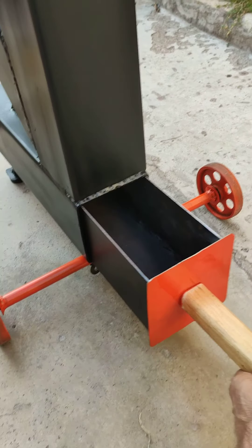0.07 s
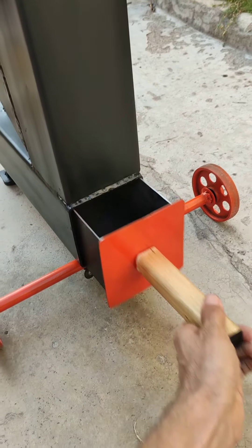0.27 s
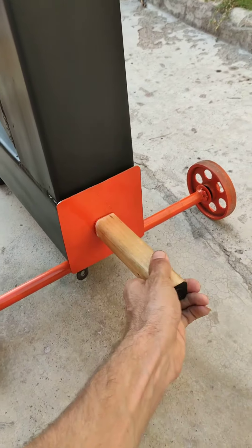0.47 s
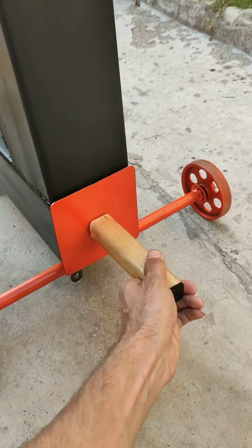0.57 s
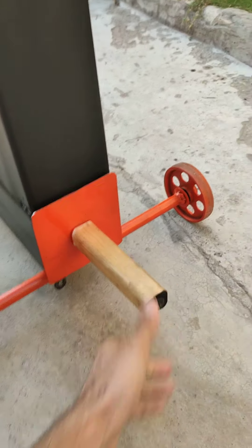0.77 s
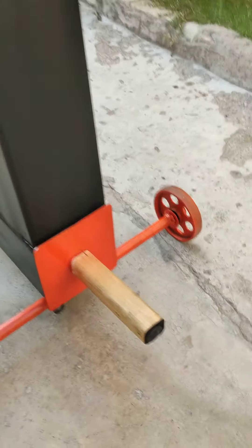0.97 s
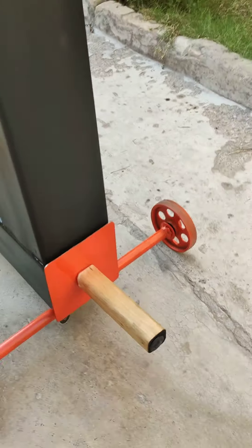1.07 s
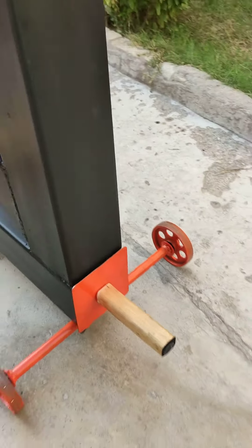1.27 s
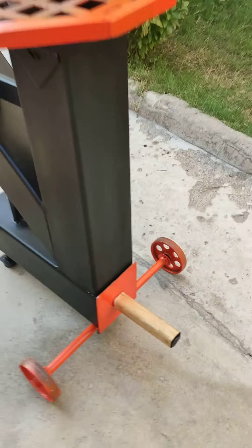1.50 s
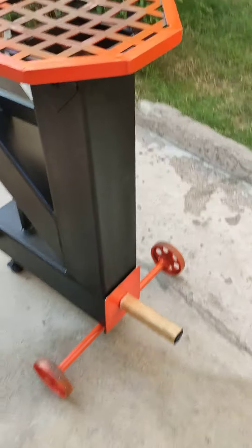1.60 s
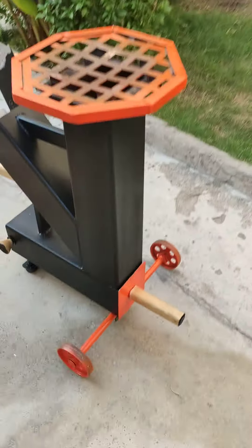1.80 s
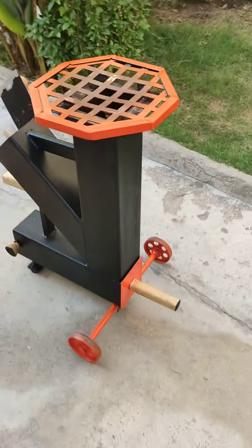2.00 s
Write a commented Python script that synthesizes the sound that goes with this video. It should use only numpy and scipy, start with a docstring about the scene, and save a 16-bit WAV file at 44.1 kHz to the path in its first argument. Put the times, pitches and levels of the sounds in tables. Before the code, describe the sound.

A steel drawer is pushed into a stove outdoors. From about 0.1 seconds it knocks in its guide and scrapes grittily, with brief squeals. Just after 0.5 seconds it shuts with a loud metallic clank whose ring dies away by about 1 second. From 1.2 to 2 seconds come soft, close ticks and rustles. A faint low rumble and hum lie underneath, with slight puffs of air on the microphone.

```python
"""A knocking, gritty scrape ends in a ringing clank: a sheet-steel drawer is pushed into a stove outdoors.
The drawer judders in its guide; steel catches and slips on steel, grinding and briefly squealing.
The clank is a quick run of front-plate contacts that leaves the stove's panels ringing.
Behind it lie a faint low rumble, a hum and puffs of air; later come soft ticks and rustles close by."""
import sys
import numpy as np
from scipy import signal
from scipy.fft import rfft, irfft
from scipy.io import wavfile
from scipy.ndimage import uniform_filter1d

SR = 44100
rng = np.random.default_rng(int(sys.argv[2]) if len(sys.argv) > 2 else 0)


def write(x):
    x = np.atleast_2d(x).T
    wavfile.write(sys.argv[1], SR, np.round(np.clip(x, -1, 1) * 32767).astype(np.int16))


N = 90404
TIME_S = np.arange(N) / SR

# Front plate hits the stove: start_s, ring_rel_db, crack_rel_db, thud_rel_db
CONTACTS = [(0.5296, -5.5, -2.5, -29), (0.5324, -1.5, 1.5, 5.5), (0.5382, -3, 4.5, -20.5),
            (0.5421, -16, 4.5, -4.5), (.551, -4.5, -1.5, -8), (0.5626, -6, -17, -23)]
# Stove modes: freq_hz, level_rel_db, t60_s, left_minus_right_db
STOVE_MODES = [(205, -42, 1.0, 0), (618, -26, 0.36, -1), (703, -30, 0.5, 1), (934, -33, 0.55, 1),
               (1086, -33, 0.75, 3), (1143, -38, 1.3, -5), (1198, -30, 0.35, 3), (1256, -32, 0.38, 5),
               (1385, -31, 0.34, -3), (1529, -29, 0.32, -6), (1714, -30, 0.42, -6), (1772, -26, 0.31, -6),
               (1965, -31, 0.37, -2), (2112, -32, 0.37, -5), (2422, -28, 0.21, 8), (2697, -34, .26, 0),
               (3064, -35, 0.28, 9), (3531, -35, .3, 3), (3885, -35, 0.27, 1), (4398, -33, 0.2, 8),
               (5580, -32, .21, 6)]
# Dense panel modes: freq_hz, density_rel_db
PANEL_SPECTRUM = [(150, -3), (300, -17), (600, 4.5), (1100, 1), (2100, 3), (2700, -4.5), (4500, -11),
                  (6300, -12), (7500, -25), (15500, -40)]
# Panel decay: freq_hz, t60_s
PANEL_DECAY = [(200, 0.54), (700, 0.33), (2000, 0.29), (6000, 0.29), (12000, 0.24)]
# Contact crack: freq_hz, density_rel_db
CRACK_SPECTRUM = [(300, -24), (1000, 7), (3300, 2), (6000, 2.5), (7200, -5.5), (9500, -9.5), (11000, -18.5),
                  (15500, -17)]
# Crack decay: freq_hz, t60_s
CRACK_DECAY = [(1000, 0.059), (5000, 0.072), (12000, 0.047)]
# Heavy stove body: freq_hz, level_rel_db
THUD_MODES = [(200, -8), (305, -1.5), (450, -4.5)]
# Friction along the slide: time_s, grind_rel_db, grit_rel_db
SLIDE_LEVELS = [(0.079, -48.5, -49), (.11, -36.5, -48.5), (.16, -37, -44.5), (.188, -40.5, -41),
                (.2, -35.5, -33), (.28, -36, -34), (0.349, -33, -36.5), (0.393, -31, -32),
                (.425, -37, -36.5), (.455, -39.5, -45), (.472, -36.5, -40.5), (0.529, -35.5, -39.5)]
# Grinding body: freq_hz, density_rel_db
GRIND_SPECTRUM = [(200, -14), (500, 1), (900, 6.5), (1350, 0.5), (2000, 3.5), (2800, -1), (4000, -38)]
# Gritty treble: freq_hz, density_rel_db
GRIT_SPECTRUM = [(1200, -38), (2500, -6), (3200, 4.5), (4600, 1.5), (6200, 2.5), (7200, -6.5),
                 (10500, -15.5), (15500, -24.5)]
# Sliding drawer: freq_hz, level_rel_db
DRAWER_MODES = [(824, -52), (933, -42.5)]
# Drawer hits its guide: start_s, level_rel_db
GUIDE_HITS = [(.1, -14), (.1245, 1), (.137, 1), (.1445, -21), (0.1504, -4.5), (0.331, -6)]
# One knock: freq_hz, level_rel_db
KNOCK_MODES = [(520, -8.5), (830, -4.5), (940, 1.5), (1880, -5.5), (2120, -5.5)]
# Friction tones: centre_s, width_s, pitch_hz, level_db
SQUEAL_TONES = [(.25, 0.016, 2380, -43), (.255, .022, 4250, -40), (.27, 0.041, 5850, -38.5),
                (.345, 0.018, 1570, -53), (.383, 0.026, 1137, -33.5), (.392, 0.0067, 3476, -31),
                (.43, 0.026, 1228, -41.5), (1.36, .04, 6000, -66)]
# Small ticks: start_s, level_db, centre_hz
TICK_EVENTS = [(1.247, -40.5, 2970), (1.546, -31, 583), (1.6158, -44.5, 3340), (1.629, -51.5, 8000),
               (1.807, -37, 4840), (2.008, -42.5, 7000), (2.021, -44.5, 8000), (2.032, -43, 7900)]
# Soft rustles: centre_s, width_s, level_db
RUSTLE_EVENTS = [(1.32, 0.014, -53), (1.399, 0.027, -54.5), (1.81, 0.052, -56.5), (1.939, 0.04, -52)]
# Rustle colour: freq_hz, density_rel_db
RUSTLE_SPECTRUM = [(1000, 1.5), (2500, -6.5), (5000, -8), (6300, 0), (7500, -16.5), (12000, -15),
                   (15500, -28)]
# Distant rumble: freq_hz, density_rel_db
RUMBLE_SPECTRUM = [(12, -5), (22, -8), (45, -16), (74, -11.5), (106, -6), (122, -12.5), (245, -2),
                   (282, -7.5), (393, -1.5), (427, -10.5), (597, -5.5), (1770, -23), (6400, -31),
                   (7900, -40.5), (15500, -48.5)]
# Hum tones: pitch_hz, level_rel_db
HUM_TONES = [(253.0, -57.5), (328.4, -58.5), (403.7, -63), (608.3, -63.5), (705.2, -75)]
# Air on the microphone: time_s, level_db
DRAUGHT_LEVELS = [(.7, -78), (.8, -62), (1.8, -62.5), (1.9, -52)]
# Clank position: freq_hz, left_minus_right_db
CLANK_BALANCE = [(200, 3), (380, -9), (700, -1.5), (1300, -5.5), (2400, 0), (4400, 6.5), (8000, 4)]
# Slide, tick and rustle position: freq_hz, left_minus_right_db
SLIDE_BALANCE = [(200, -1.5), (1200, 1.5), (2400, -0.5), (4400, 10), (8000, 11.5), (15000, 6.5)]
# Background position: freq_hz, left_minus_right_db
AIR_BALANCE = [(30, 0), (150, 2.5), (1000, 0.5), (6000, 6.5)]
# Left-right likeness, near sources: freq_hz, correlation
NEAR_COHERENCE = [(200, 0.78), (400, 1), (750, 0.23), (1500, 0.18), (8000, 0.067)]
# Left-right likeness, background: freq_hz, correlation
AIR_COHERENCE = [(30, 0.2), (120, 0.98), (300, 0.88), (700, 0.67), (1500, 0)]


def clank():
    """Each contact cracks, thuds and adds energy to the stove's ringing modes."""
    out = np.zeros((2, N))
    panels = ring(PANEL_SPECTRUM, PANEL_DECAY, CLANK_BALANCE, ragged_db=2)
    after_ring = ring(PANEL_SPECTRUM, [(1000, 0.81)], CLANK_BALANCE)  # the freest panels ring on
    add(out, CONTACTS[2][0], amp(-35.5) * after_ring)
    for start_s, ring_db, crack_db, thud_db in CONTACTS:
        crack = ring(CRACK_SPECTRUM, CRACK_DECAY, CLANK_BALANCE, ragged_db=2)
        add(out, start_s, amp(ring_db - 20) * panels)
        add(out, start_s, amp(crack_db - 15.5) * crack)
        add(out, start_s, amp(thud_db - 19) * strike(THUD_MODES, CLANK_BALANCE, t60_s=0.036))
    for hz, db, t60_s, balance_db in STOVE_MODES:
        energy = sum((TIME_S > start_s) * amp(ring_db - 60 * np.abs(TIME_S - start_s) / t60_s) ** 2
                     for start_s, ring_db, _, _ in CONTACTS)
        envelope = np.sqrt(np.abs(uniform_filter1d(energy, 40)))
        lag_rad = np.arccos(lookup(NEAR_COHERENCE, hz)) * rng.choice([-1, 1])
        phase_rad = 2 * np.pi * (hz * TIME_S + rng.random()) + np.array([[0], [lag_rad]])
        out += amp(db - 3) * envelope * pan(balance_db) * np.sin(phase_rad)
    return out


def scrape():
    """Steel catches and slips on steel: a grinding body, bright grit and the drawer's modes."""
    time_s, grind_db, grit_db = np.transpose(SLIDE_LEVELS)
    moving = np.interp(TIME_S, [time_s[0] - 0.003, time_s[0], time_s[-1], time_s[-1] + 0.01], [0, 1, 1, 0])
    chatter = wander(rate_hz=150)
    grind_force = moving * amp(np.interp(TIME_S, time_s, grind_db) + chatter)
    grit_force = moving * amp(np.interp(TIME_S, time_s, grit_db) + 0.63 * chatter)
    grind = rub(grind_force * unit(slips(per_s=2500, spread_db=2.5)[0]), GRIND_SPECTRUM, t60_s=0.11)
    grit = rub(grit_force * unit(slips(per_s=9000, spread_db=-2.5)[0]), GRIT_SPECTRUM, t60_s=0.036)
    out = amp(1.57) * grind + amp(2) * grit
    for hz, db in DRAWER_MODES:
        drive = grind_force * slips(per_s=2500, spread_db=2.5)
        out += amp(db - 3) * pan(lookup(SLIDE_BALANCE, hz)) * resonate(drive, hz, t60_s=0.28)
    return out


def rub(drive, spectrum, t60_s, spots=7):
    """Slips ring the drawer's dense modes; as the contact travels, other modes take over."""
    position = np.interp(TIME_S, [SLIDE_LEVELS[0][0], SLIDE_LEVELS[-1][0]], [0, spots - 1])
    out = 0
    for spot in range(spots):
        body = ring(spectrum, [(1000, t60_s)], SLIDE_BALANCE, size=8192, ragged_db=2.5)
        body /= np.sqrt((body ** 2).sum() / 2)
        nearness = np.cos(np.pi / 2 * np.clip(position - spot, -1, 1))
        out += signal.fftconvolve((nearness * drive)[None], body, axes=1)[:, :N]
    return out


def knocks():
    """The drawer judders against its guide, each dull knock at a slightly different spot."""
    out = np.zeros((2, N))
    for start_s, db in GUIDE_HITS:
        modes = [(hz * (1 + 0.041 * rng.standard_normal()), mode_db) for hz, mode_db in KNOCK_MODES]
        add(out, start_s, amp(db - 30) * strike(modes, SLIDE_BALANCE, t60_s=0.11))
    return out


def squeals():
    """Short, wavering friction tones."""
    out = 0
    for centre_s, width_s, hz, db in SQUEAL_TONES:
        phase_rad = 2 * np.pi * np.cumsum(hz * (1 + 0.006 * wander(rate_hz=150))) / SR
        tone = np.sin(phase_rad + np.array([[0], [1]]))
        out += amp(db) * pan(lookup(SLIDE_BALANCE, hz)) * swell(centre_s, width_s) * tone
    return out


def handling():
    """Soft gritty rustles and dry ticks close by."""
    envelope = sum(amp(db) * swell(centre_s, width_s) for centre_s, width_s, db in RUSTLE_EVENTS)
    out = envelope * colour(slips(per_s=2800, spread_db=3), RUSTLE_SPECTRUM, SLIDE_BALANCE, NEAR_COHERENCE)
    for start_s, db, hz in TICK_EVENTS:
        spectrum = [(hz / 4, -25), (hz * 0.69, 0), (hz * 1.13, -1), (hz * 2.1, -15), (hz * 5, -45)]
        add(out, start_s, amp(db) * ring(spectrum, [(4000, 0.0087)], SLIDE_BALANCE, size=4096))
    return out


def rumble(fade_db_per_s=3):
    """Distant rumble whose low end slowly fades."""
    noise = air_noise(RUMBLE_SPECTRUM) * amp(0.5 * wander(rate_hz=10))
    low = signal.sosfiltfilt(signal.butter(2, 500, fs=SR, output="sos"), noise)
    low_gain = amp(-fade_db_per_s * (TIME_S - 0.5))
    return amp(-46.5) * (noise + low * (low_gain - 1))


def hum():
    """Wavering hum: narrow resonances driven by near-white noise."""
    spectrum = [(100, 0.0061), (1000, 0.012)]
    return sum(amp(db + 1) * resonate(air_noise(spectrum), hz, t60_s=0.45) for hz, db in HUM_TONES)


def draught():
    """Deep puffs of air on the microphone."""
    envelope = amp(np.interp(TIME_S, *np.transpose(DRAUGHT_LEVELS)))
    return envelope * air_noise([(20, -6.5), (48, 11), (75, -13), (800, -79)])


def air_noise(spectrum):
    """Stereo noise placed in the background."""
    return colour(rng.standard_normal((2, N)), spectrum, AIR_BALANCE, AIR_COHERENCE)


def ring(spectrum, decay, balance, size=32768, ragged_db=0, bunch_hz=107, attack_s=0.00046):
    """Countless close modes struck at once, bunched into peaks, each band dying at its own rate."""
    bunches = unit(uniform_filter1d(rng.standard_normal(size // 2 + 1), round(bunch_hz * size / SR)))
    treble_weight = np.minimum(np.fft.rfftfreq(size, 1 / SR) / 4000, 1)
    bins = rfft(rng.standard_normal((2, size))) * amp(ragged_db * treble_weight * bunches)
    noise = colour(irfft(bins), spectrum, balance, NEAR_COHERENCE)
    hz, time_s, bands = signal.stft(noise, SR, nperseg=256)
    decay_db = -60 * np.minimum(time_s / lookup(decay, hz)[:, None], 10)
    tail = signal.istft(bands * amp(decay_db), SR, nperseg=256)[1][:, :size]
    return low_cut(tail * np.minimum(TIME_S[:size] / attack_s, 1))


def strike(modes, balance, t60_s):
    """A few well-damped modes struck once."""
    tones = sum(pan(lookup(balance, hz)) * amp(db - 60 * TIME_S / t60_s) * np.sin(2 * np.pi * hz * TIME_S)
                for hz, db in modes)
    return low_cut(low_cut(tones))


def low_cut(x, cutoff_hz=168):
    """High-pass: the struck and rung sounds carry no deep bass."""
    return signal.sosfilt(signal.butter(4, cutoff_hz, "high", fs=SR, output="sos"), x)


def resonate(drive, hz, t60_s):
    """One driven mode, rms 1."""
    pole = np.exp((2j * np.pi * hz - np.log(1000) / t60_s) / SR)
    return unit(signal.lfilter([1], [1, -pole], drive).real)


def slips(per_s, spread_db):
    """Two trains of tiny random contacts of uneven size."""
    strength = amp(spread_db * np.minimum(rng.exponential(1, (2, N)), 4))
    return strength * rng.choice([-1, 1], (2, N)) * (rng.random((2, N)) < per_s / SR)


def wander(rate_hz):
    """Smooth random drift, rms 1."""
    hz = np.fft.rfftfreq(N, 1 / SR)
    return unit(irfft(rfft(rng.standard_normal(N)) * np.exp(-(hz / rate_hz) ** 2), N))


def swell(centre_s, width_s):
    """Gaussian envelope."""
    return np.exp(-((TIME_S - centre_s) / width_s) ** 2 / 2)


def colour(pair, spectrum, balance, coherence):
    """Gives two unrelated signals a spectrum and a stereo position, rms 1."""
    size = pair.shape[1]
    hz = np.fft.rfftfreq(size, 1 / SR)
    left, other = rfft(pair)
    correlation = lookup(coherence, hz)
    right = correlation * left + np.sqrt(1 - correlation ** 2) * other
    gains = pan(lookup(balance, hz)) * amp(lookup(spectrum, hz))
    return unit(irfft(np.array([left, right]) * gains, size))


def pan(balance_db):
    """Constant-power left and right gains."""
    gains = amp(np.array([balance_db, -balance_db]) / 2).reshape(2, -1)
    return gains / np.sqrt((gains ** 2).mean(0))


def lookup(table, hz):
    """Interpolates on a log-frequency axis."""
    table_hz, values = np.transpose(table)
    return np.interp(np.log(hz + 1), np.log(table_hz + 1), values)


def add(mix, start_s, sound):
    """Mixes in a stereo sound."""
    part = mix[:, round(start_s * SR):][:, :sound.shape[1]]
    part += sound[:, :part.shape[1]]


def amp(db):
    """Decibels to gain."""
    return 10 ** (np.asarray(db) / 20)


def unit(x):
    """Scales to rms 1."""
    return x / np.sqrt(np.mean(x ** 2) + 1e-20)


def scene():
    """All sources, in stereo."""
    return scrape() + squeals() + knocks() + clank() + rumble() + hum() + draught() + handling()


def record(dry, ceiling=0.95, cutoff_hz=15850):
    """Soft peak limit, then low-pass."""
    rounded = dry / (1 + (dry / ceiling) ** 4) ** 0.25
    low_pass = signal.firwin(511, cutoff_hz, window=("kaiser", 9), fs=SR)
    return signal.oaconvolve(rounded, low_pass[None], "same")


dry = scene()
out = record(dry)
write(out)
```